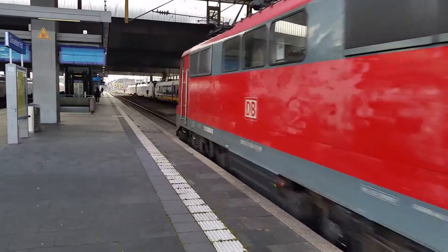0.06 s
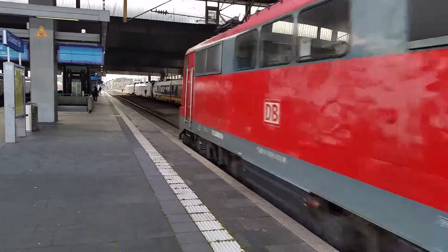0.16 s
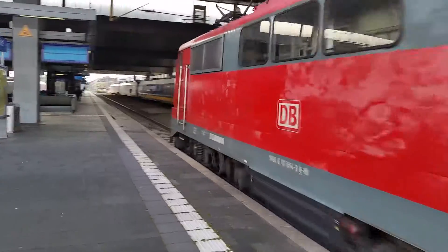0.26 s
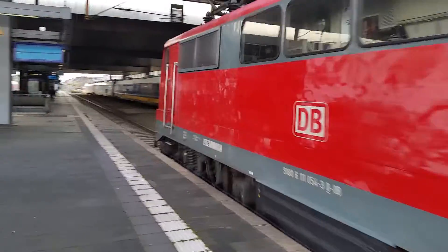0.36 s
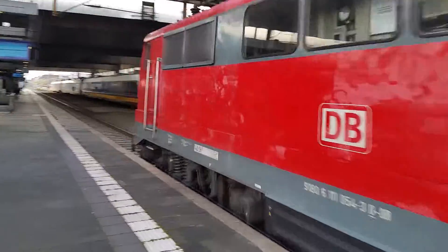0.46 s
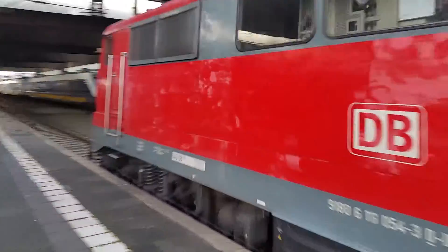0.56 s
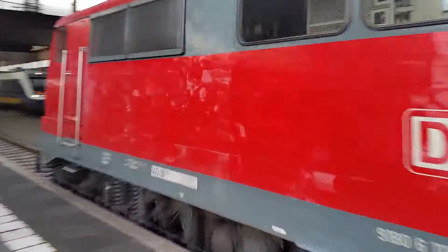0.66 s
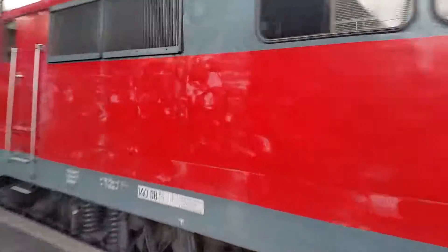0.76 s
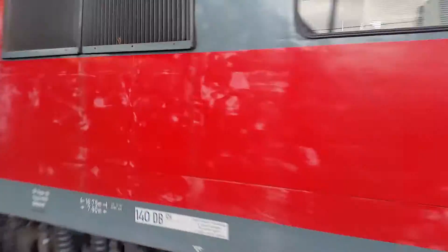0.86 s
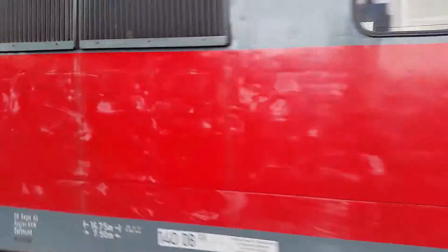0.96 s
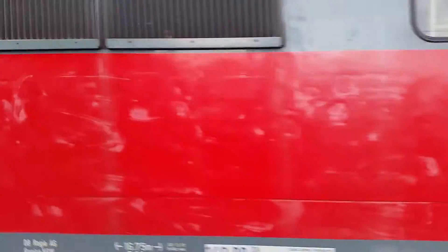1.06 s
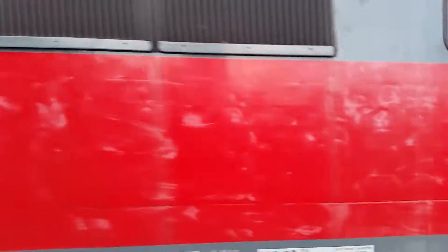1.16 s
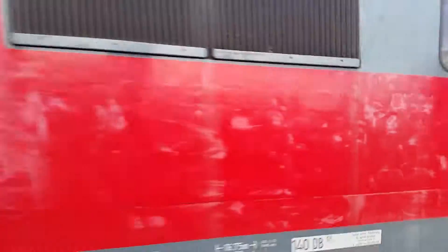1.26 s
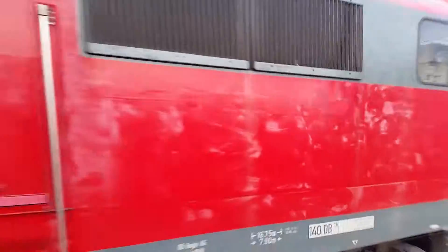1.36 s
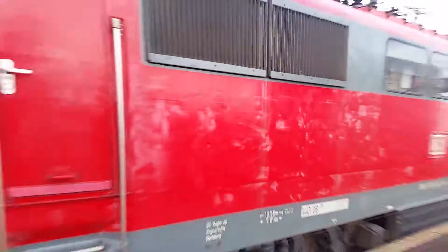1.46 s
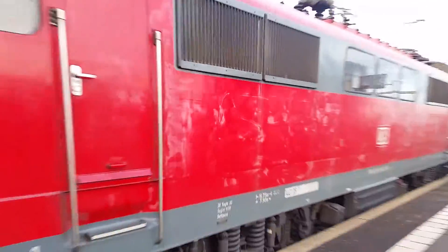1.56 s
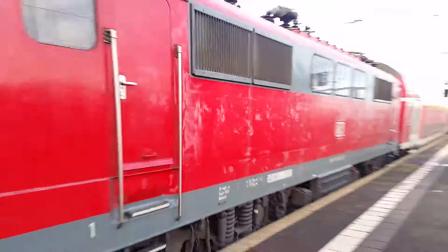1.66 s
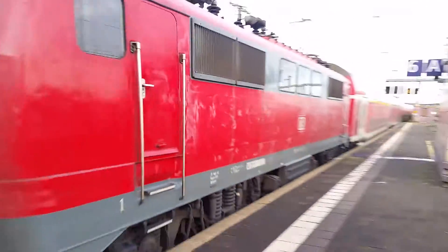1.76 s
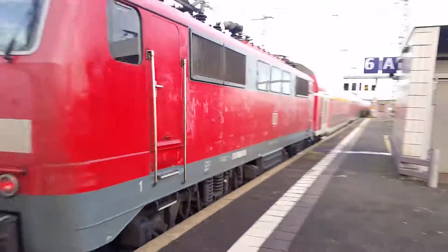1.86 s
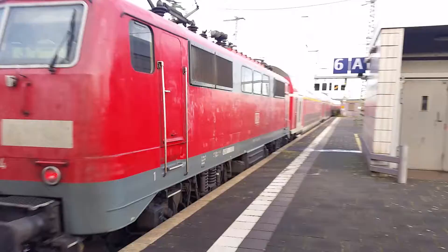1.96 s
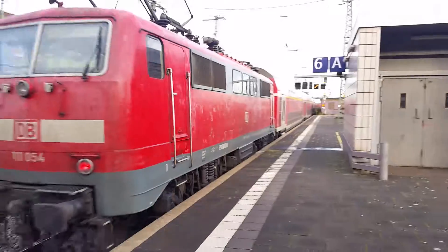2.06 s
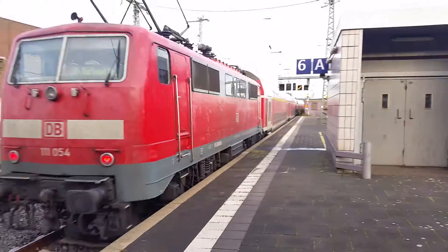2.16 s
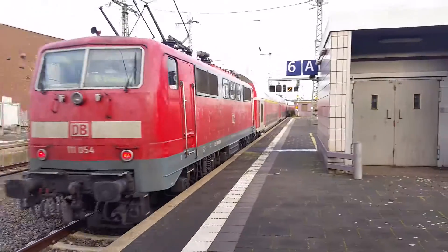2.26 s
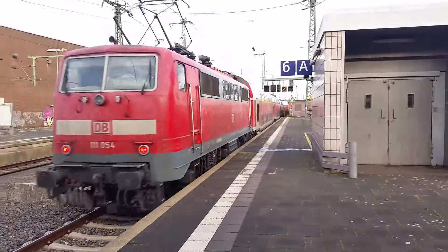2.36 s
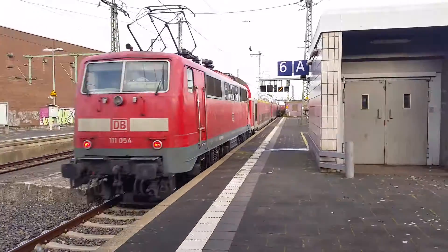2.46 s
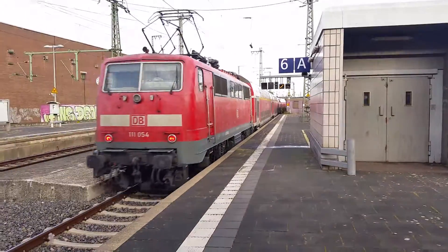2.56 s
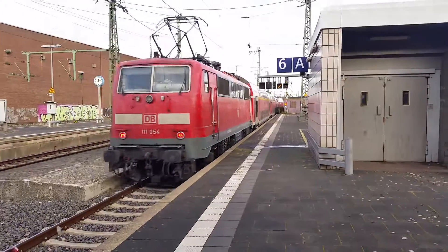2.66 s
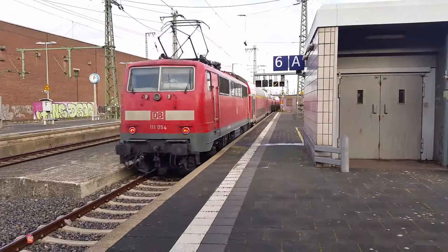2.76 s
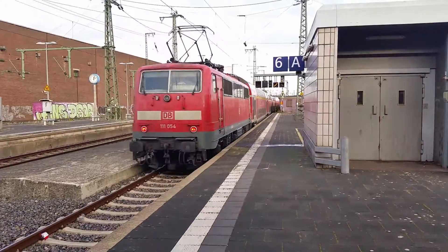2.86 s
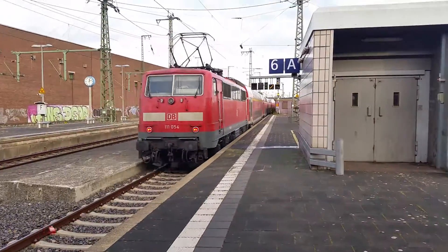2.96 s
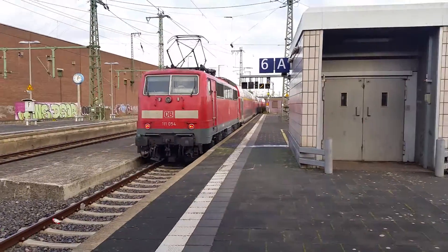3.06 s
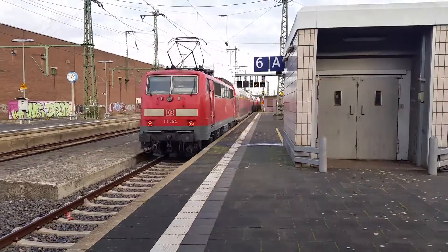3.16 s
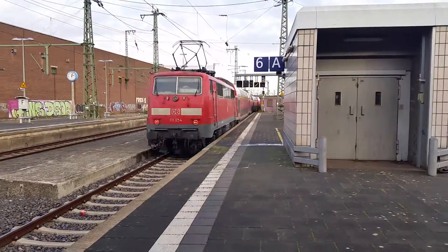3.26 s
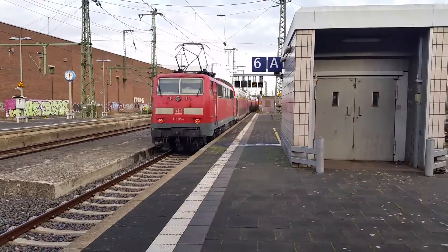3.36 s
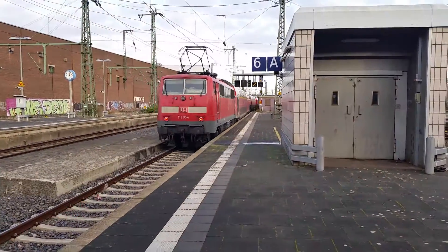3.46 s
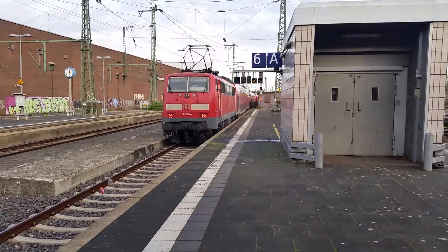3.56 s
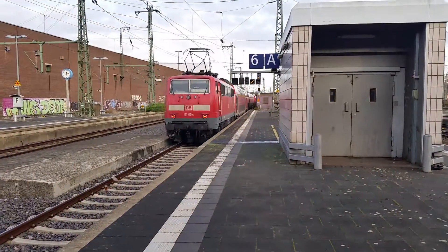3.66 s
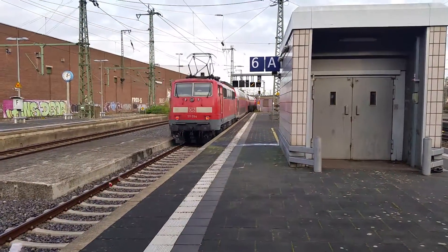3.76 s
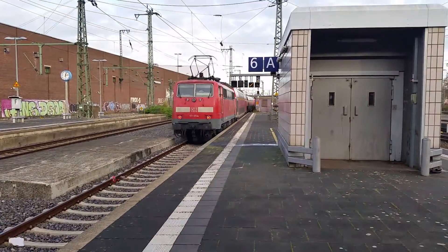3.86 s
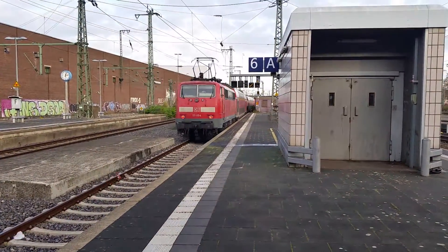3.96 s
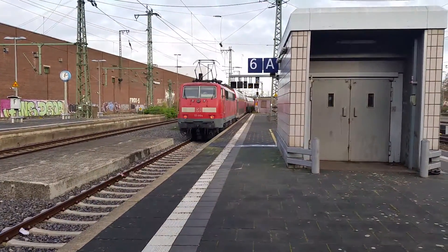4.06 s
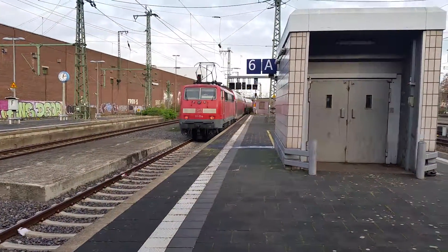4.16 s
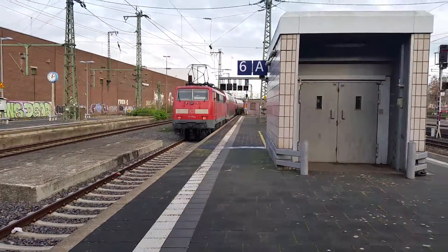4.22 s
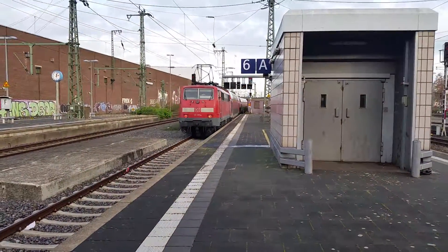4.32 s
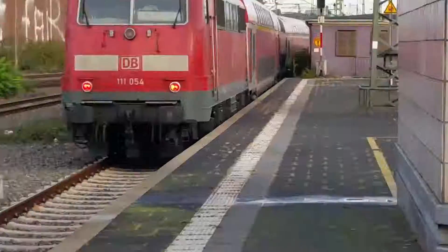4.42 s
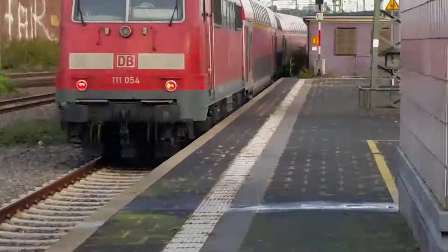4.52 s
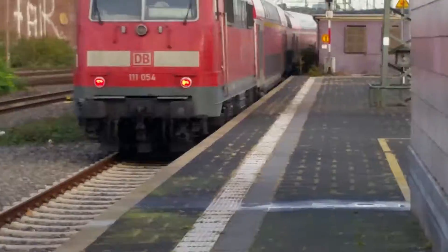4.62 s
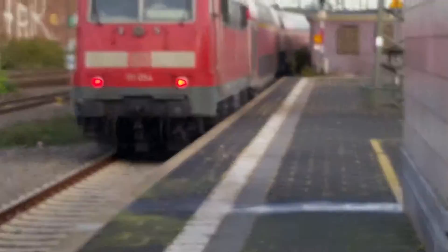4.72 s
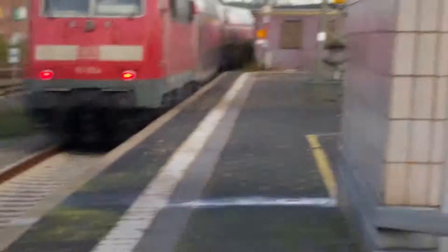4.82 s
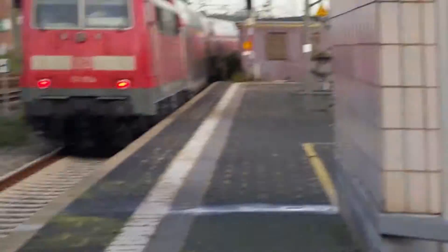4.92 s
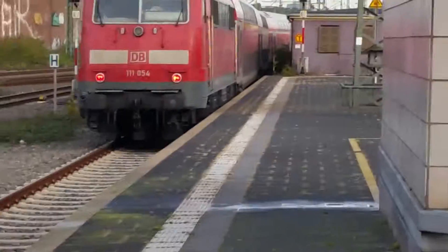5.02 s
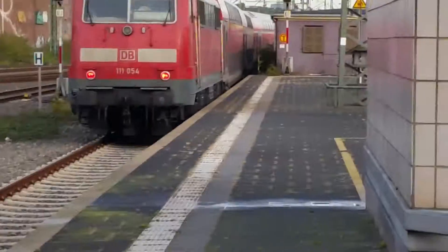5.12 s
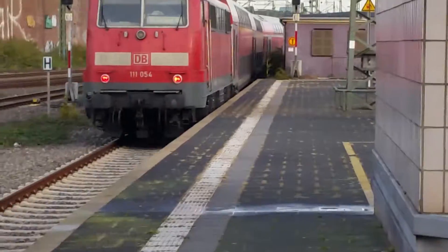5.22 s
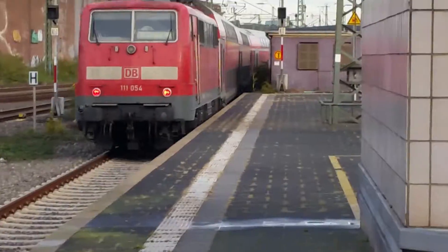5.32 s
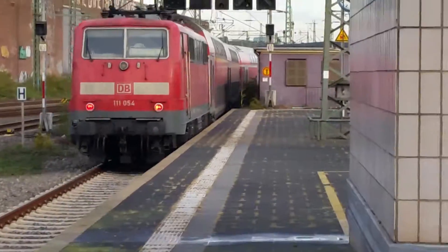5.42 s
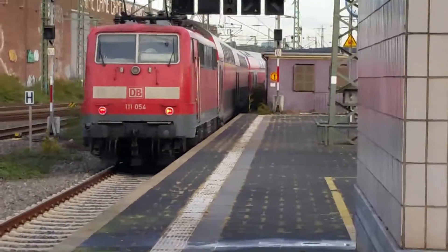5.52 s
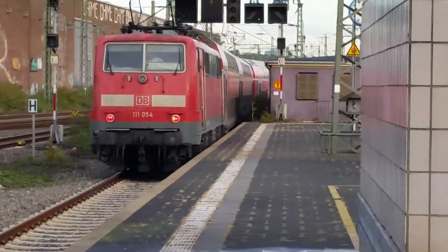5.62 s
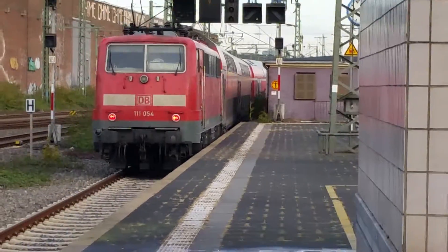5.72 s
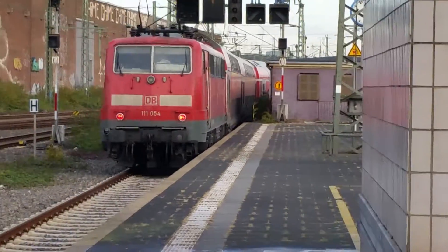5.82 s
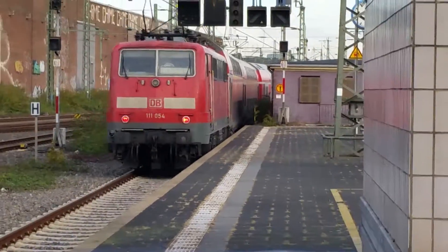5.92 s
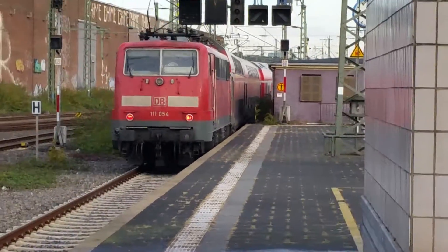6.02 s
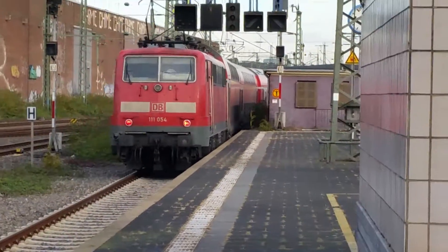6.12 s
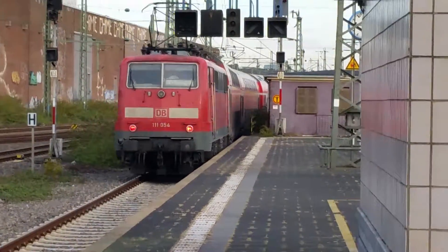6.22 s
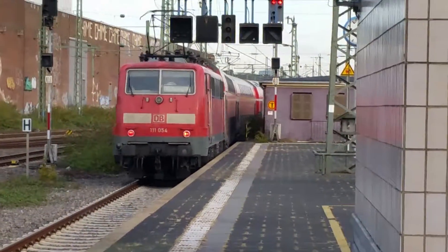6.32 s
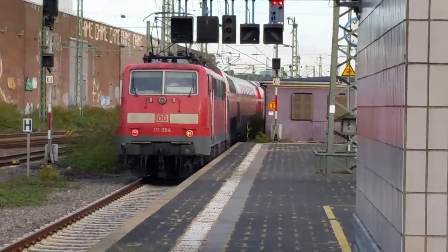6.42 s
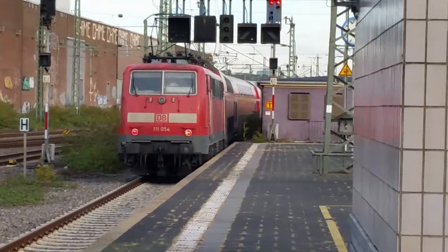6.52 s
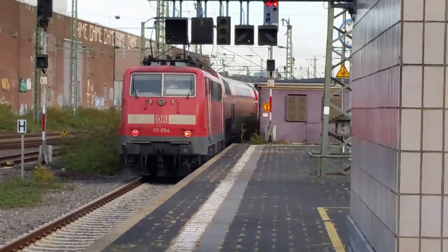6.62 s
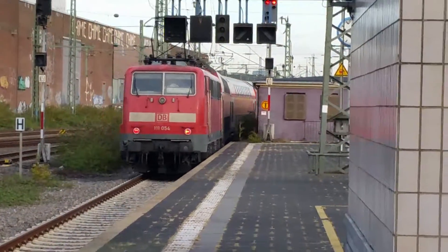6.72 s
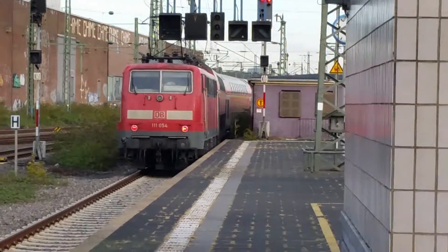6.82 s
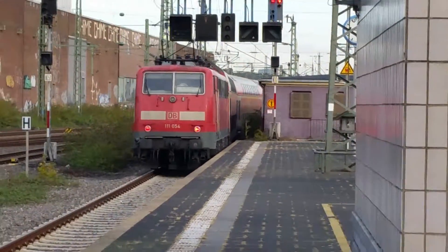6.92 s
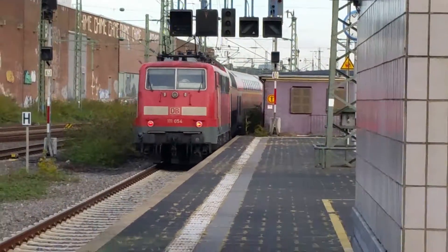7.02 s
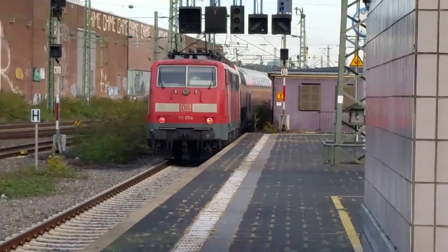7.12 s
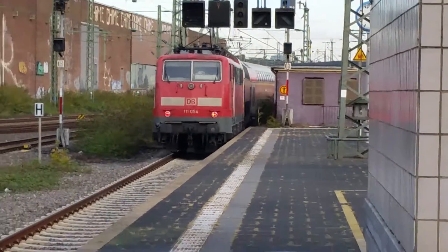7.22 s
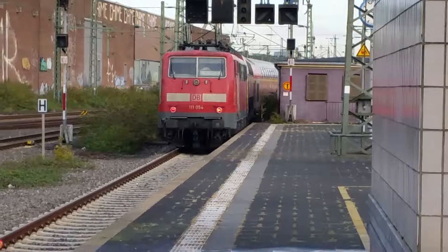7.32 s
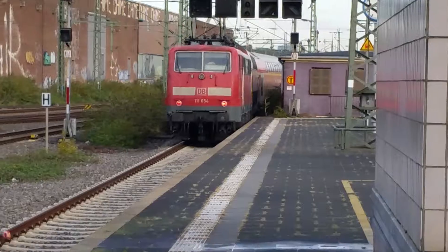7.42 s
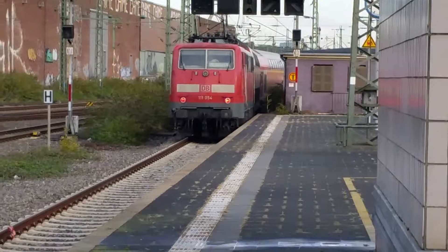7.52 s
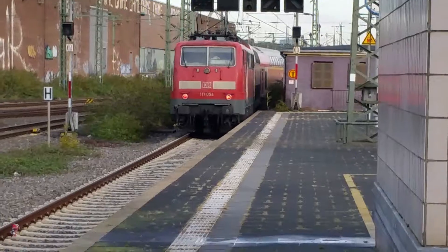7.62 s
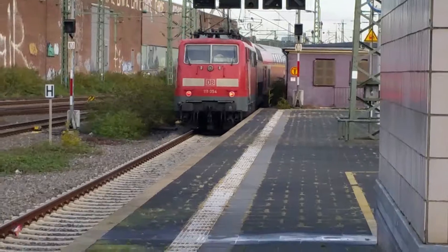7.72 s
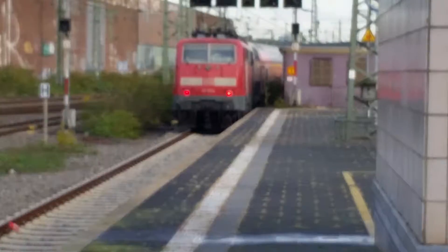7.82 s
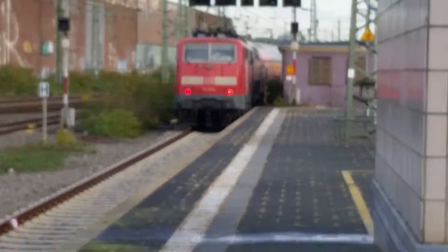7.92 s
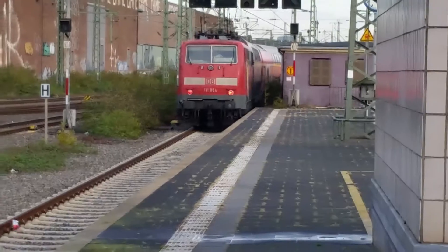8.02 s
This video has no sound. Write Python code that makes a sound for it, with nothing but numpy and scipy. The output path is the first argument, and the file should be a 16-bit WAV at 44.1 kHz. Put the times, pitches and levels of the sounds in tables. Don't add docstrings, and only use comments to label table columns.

```python
import sys
import numpy as np
from scipy import signal
from scipy.io import wavfile
from scipy.ndimage import uniform_filter1d

SR = 44100
rng = np.random.default_rng(int(sys.argv[2]) if len(sys.argv) > 2 else 0)


def natural_amplitude(level_db):
    exponent = np.asarray(level_db, float) / 20
    return 10 ** exponent


def generate_wav(sig):
    pcm = np.round(np.clip(np.atleast_2d(sig).T, -1, 1) * 32767).astype(np.int16)
    wavfile.write(sys.argv[1], SR, pcm)


N = 356328

# (time [s], loss with distance [dB])
DISTANCE_LOSS = [(0, 1), (.05, 0.5), (.5, 0), (.72, -2.1), (1.0, 0.5), (1.5, -2.64), (1.8, -3), (2.1, -4),
                 (2.4, -6.5), (2.6, -5), (3.2, -5.5), (3.75, -7.5), (4.0, -8.5), (4.9, -11.5), (6.4, -14),
                 (7.5, -14), (8.08, -15.5)]


def ramps(table):
    s, *columns = np.transpose(table)
    return [np.interp(np.arange(N) / SR, s, column) for column in columns]


def over_hz(table, hz):
    f, value = np.transpose(table)
    return np.interp(np.log(hz + 1), np.log(f + 1), value)


def walk(rate):
    k = int(SR / rate)
    held = np.repeat(rng.standard_normal(N // k + 1), k)[:N]
    return 1.316 * uniform_filter1d(uniform_filter1d(held, k), k)


def ring(x, hz, width_hz):
    return signal.lfilter(*signal.iirpeak(hz, hz / width_hz, fs=SR), x)


def pan(db):
    return natural_amplitude(np.array([db, -db]) / 2)


def swells(rows):
    t = np.arange(N) / SR
    return sum(db * np.exp(-((t - s) / width) ** 2) for s, db, width in rows)


def duck(attack_s):
    knock_s, recover_s, recover_length_s = 4.946, 5.77, 0.47
    t = np.arange(N) / SR
    fall = 1 - np.exp(-np.maximum(t - knock_s, 0) / attack_s)
    return fall * np.clip(1 - (t - recover_s) / recover_length_s, 0, 1)


def tone(hz, db, wobble_hz, rough_db, pan_db, lag):
    phase = 2 * np.pi * np.cumsum(hz + wobble_hz * walk(20.0)) / SR
    size = np.sqrt(2) * natural_amplitude(db + rough_db * walk(10.0))
    return pan(pan_db)[:, None] * size * np.sin(phase + np.array([[lag], [-lag]]))


def yard_hum():
    dip_db = -13.0 * duck(.08)
    return (tone(234.0, -38.5 + dip_db * 0.79, wobble_hz=2.2, rough_db=3.0, pan_db=0.0, lag=.05)
            + tone(145.0, -42 + dip_db * 0.62, wobble_hz=3.16, rough_db=3.5, pan_db=-4.0, lag=.05))


def singing_rail():
    # (time [s], pitch [Hz], level [dB])
    rail_tone = [(5.8, 3150, -95), (6.6, 3150, -60), (6.9, 3150, -56), (8.08, 3150, -56)]
    return tone(*ramps(rail_tone), wobble_hz=2.0, rough_db=.8, pan_db=-12.0, lag=.1)


def rustles():
    # (time [s], peak [dB], left minus right [dB], centre [Hz])
    slides = [(1.7644, -34, -4, 9530), (1.839, -35, 0.5, 8790), (2.3271, -35, 1.5, 14300),
              (2.4389, -34, 1.5, 12200), (2.8494, -40, -19, 8900), (3.0061, -31, -1, 8900),
              (3.0494, -34, -1, 10600), (3.3394, -39.5, -7, 8820), (3.4151, -33, 1.5, 9560),
              (3.8694, -43, 6, 15100), (3.929, -37, 6, 12000), (4.1779, -32, 2, 14700),
              (4.2343, -35, 0.5, 8910), (4.315, -32, 1.0, 15400), (4.8095, -48, -14, 9650),
              (5.0469, -45, -7, 11100), (6.6857, -56, 11, 15000), (6.691, -43, 2, 4500),
              (6.8573, -64, 6, 14400)]
    # (time [s], peak [dB], left minus right [dB], centre [Hz])
    slips = [(0.3501, -33, 6.5, 14300), (2.2583, -26, 5, 11600), (3.0969, -26, 11, 13900),
             (3.1238, -29, 5.0, 14500), (3.653, -25, 1.0, 9000), (3.687, -31, -3.0, 10700),
             (4.0537, -28, -2.0, 10400), (4.0574, -28, -4.5, 9000), (4.0624, -26, -5.0, 7500),
             (4.1185, -38, -4, 8730), (4.4894, -48, -2.0, 9120), (4.5146, -36, -4, 13600),
             (4.9556, -37, 5, 13000), (5.3788, -63, 10.5, 15000), (6.6982, -43, 8.5, 15200),
             (6.9126, -50, -3, 14270), (7.443, -53, 4.0, 15400), (7.9474, -54, 3.0, 14900)]
    slide_ms, slip_ms = 18, 2.5
    out = np.zeros((2, N + 4096))
    t = np.arange(4096) / SR
    chance = rng.standard_normal((len(slides + slips), 2, 2, 4096))
    lengths_ms = [slide_ms] * len(slides) + [slip_ms] * len(slips)
    for (s, db, pan_db, hz), ms, (hiss, grain) in zip(slides + slips, lengths_ms, chance):
        shape = np.minimum(t / 0.00031, 1) * np.exp(-(t * 1000 / ms) ** 2)
        crackle = hiss * natural_amplitude(2 * uniform_filter1d(grain, size=30) * np.sqrt(30))
        burst = shape * (np.diff(crackle, prepend=0) * 0.13 + ring(crackle, hz, 7800.0))
        i = int(s * SR)
        out[:, i:i + 4096] += natural_amplitude(db - 1.5) * pan(pan_db)[:, None] * burst / np.abs(burst).max()
    return out[:, :N]


def knocks():
    # (time [s], thump [dB], thump pitch [Hz], click [dB], thump left minus right [dB])
    taps = [
        (3.0490, -14, 170, -42, 14),
        (3.1245, -14, 260, -27, 12),
        (4.3039, -9, 200, -11, 10),
        (4.9535, -5, 220, -30, 12),
        (4.9556, 7, 300, -2, 7),
        (5.3400, -42, 250, -27, 6),
        (6.1275, -16, 220, -45, 2),
        (6.698, -45, 250, -30, 8),
    ]
    # (frequency [Hz], width [Hz], level [dB])
    case_modes = [(3750, 340, 4), (2300, 600, -5), (1450, 400, -3), (6800, 2500, -7)]
    out = np.zeros((2, N + 4096))
    tick = np.zeros(2048)
    tick[:12] = np.hanning(12)
    click = -sum(natural_amplitude(db) * ring(tick, f, w) for f, w, db in case_modes)
    for s, thump_db, hz, click_db, pan_db in taps:
        cycles = np.arange(2048) * hz / SR
        thump = np.sin(2 * np.pi * cycles) * cycles ** 2 * np.exp(-3.8 * cycles)
        thump = natural_amplitude(thump_db) * thump / np.abs(thump).max()
        snap = natural_amplitude(click_db) * click / np.abs(click).max()
        i = int(s * SR)
        out[0, i:i + 2048] += thump + snap
        out[1, i + 16:i + 2064] += thump * natural_amplitude(-pan_db) + snap * natural_amplitude(-15)
    return out[:, :N]


def machines():
    # (time [s], lift, below 0 a dip [dB], half width
    # [s])
    motor_swells = [(.38, -39, 0.082), (2.15, -10, 0.36), (2.75, -4, .15)]
    gear_swells = [(.3, 12.7, 0.27), (.6, 10.3, 0.081)]
    blade_swells = [(0.46, 11.8, .2), (1.135, 13.6, 0.16), (0.73, 8.5, 0.1)]
    t, loss = np.arange(N) / SR, ramps(DISTANCE_LOSS)[0]

    def slide(hz, share):
        return hz * (1 - share * np.tanh((t - .9) / 0.938))

    def gone(s):
        return -45.0 * np.maximum(t - s, 0)

    motor_db = -17 + 0.82 * loss + swells(motor_swells) + gone(2.85)
    gear_db = -31 + swells(gear_swells) + gone(2.45)
    blade_db = -33 + 0.93 * loss + swells(blade_swells) + gone(1.3)
    whine_db = -33 + 0.83 * loss - 13.0 * duck(.08) + gone(6.18) - 30 * np.maximum(2.4 - t, 0)
    return (tone(slide(214.0, 0.0214), motor_db, wobble_hz=3.26, rough_db=0.5, pan_db=0.3, lag=0.058)
            + tone(slide(171.5, 0.0274), gear_db, wobble_hz=3.1, rough_db=-0.5, pan_db=0.5, lag=0.064)
            + tone(slide(461.0, .03), blade_db, wobble_hz=7.07, rough_db=1.5, pan_db=-3.0, lag=.3)
            + tone(460.0, whine_db, wobble_hz=3.0, rough_db=3.0, pan_db=-9.0, lag=0.9))


def source_levels():
    # (level alongside [dB], share of the loss, shade before the vents face us [dB], duck [dB], attack [s])
    sources = [
        (-12.5, 1.08, -1.1, -15.5, 0.15),
        (-21, 1.026, 0, -15.5, 0.11),
        (-35.5, 1.094, -5, -23, 0.25),
        (-46, 1.5, -4.5, -32, 0.22),
    ]
    # (time [s], lift [dB], half width [s])
    surges = [(1.45, 6, 0.24), (2.85, 0.73, 0.34)]
    surge_shares = [0.044, 0.87, 0.52, 0.65]
    vents_s, vents_turn_s = 0.74, 0.14
    loss, t = ramps(DISTANCE_LOSS)[0], np.arange(N) / SR
    hidden = .5 - .5 * np.tanh((t - vents_s) / vents_turn_s)
    return [db + share * loss + shade_db * hidden + duck_db * duck(attack_s) + surge * swells(surges)
            for (db, share, shade_db, duck_db, attack_s), surge in zip(sources, surge_shares)]


def two_ports(hz, shared, own):
    # (frequency [Hz], likeness of the ports [0-1])
    likeness = [(30, .9), (60, .96), (130, .99), (290, .97), (640, .86), (1100, .62), (2200, .5),
                (4400, .3), (8000, .15), (15000, .1)]
    # (frequency [Hz], lead of the left [rad])
    lead = [(0, -1.5), (1030, -0.02), (1290, 1.63), (2150, 12.5), (2410, 12.5), (3270, 15), (5510, 17),
            (6200, 16.5), (8100, 21.5), (10900, 34.5), (12400, 39.5), (13000, 34), (16000, 49), (16600, 46)]
    # (frequency [Hz], left minus right [dB])
    balance = [(60, 1.2), (110, 1.6), (200, 1), (380, 0.5), (700, 4), (1290, 2), (2380, -2.5), (4400, -5.5),
               (8120, -1.5), (15000, 10)]
    like = over_hz(likeness, hz)[:, None]
    turn = np.exp(1j * over_hz(lead, hz))[:, None]
    pair = np.array([shared * turn, like * shared + np.sqrt(1 - like ** 2) * own])
    left, right = pan(over_hz(balance, hz))[..., None]
    summed = np.abs(left * turn + right * like) ** 2 + right ** 2 * (1 - like ** 2)
    return pair * np.array([left, right]) * 2 / np.sqrt(summed)


def colour(bass, treble, hz):
    join_hz = 1400
    step = over_hz(bass, join_hz) - over_hz(treble, join_hz)
    return np.where(hz < join_hz, over_hz(bass, hz), over_hz(treble, np.minimum(hz, 15400)) + step)


def patch_flicker(hz, frames):
    # (frequency [Hz], spread [dB])
    spread = [(100, 2.2), (1500, 1.7), (5000, .9), (15000, .8)]
    patches = np.array([walk(6.0)[frames] for _ in range(30)])
    place = np.clip(3 * np.log2((hz + 1) / 25), 0, 29)
    flicker = np.array([np.interp(place, np.arange(30), row) for row in patches.T]).T
    return over_hz(spread, hz)[:, None] * flicker


def train_noise():
    edges_hz = [30, 560, 3200, 7500, 15800]
    # (frequency [Hz], level [dB per Hz])
    near_bass = [(18, -49), (30, -32), (74, -2), (114, -6), (160, 4.5), (213, -3.5), (259, 1), (346, 0.5),
                 (426, -7.5), (454, 0), (569, -21.5), (967, -22), (1400, -27.5), (1820, -39), (3080, -120)]
    near_treble = [(820, -39), (1400, -3), (1500, -3.5), (1730, 0), (2410, -4), (4810, -16.5),
                   (5370, -12.5), (8430, -31), (11500, -34), (13800, -43), (15200, -38.5)]
    far_bass = [(18, -53), (30, -13.5), (69, -3), (134, -2), (285, -6), (412, -14), (454, -16), (492, -19),
                (588, -18.5), (999, -18.5), (1080, -21), (1400, -29), (1820, -38), (3080, -120)]
    far_treble = [(1400, -4), (1710, 0), (1970, -7), (2340, -1), (2970, -11), (3350, -9), (4480, -16),
                  (6000, -22), (6970, -29), (7480, -38), (8200, -37), (8700, -50), (13200, -42),
                  (15000, -33)]
    # (time [s], far share of rumble and roll [0-1], far share of hiss and air [0-1])
    far_share = [(0, 0.45, 0.35), (1.6, 0.04, 0.53), (2.2, 0.53, 0.02), (3.0, 0.68, 0), (3.6, 0.91, 0),
                 (4.9, 0.96, 0.3), (5.2, 0.86, 1), (8.08, 0.98, 0.92)]
    # (time [s], lift [dB], half width [s])
    bogie_swells = [(.28, 4.5, .22), (1.35, 6, .33), (2.2, -4, .4), (3.8, 2.5, .6)]
    wheel_low_swells = [(.42, 3, .12), (1.3, 8, .22)]
    wheel_width_hz = 260

    noise = rng.standard_normal((2, N))
    hz, s, (shared, own) = signal.stft(noise, SR, nperseg=2048, noverlap=1536)
    frames = np.minimum(s * SR, N - 1).astype(int)
    pair = two_ports(hz, shared, own)

    near, far = colour(near_bass, near_treble, hz), colour(far_bass, far_treble, hz)
    bass_away, treble_away = np.array(ramps(far_share))[:, frames]
    away = np.where(hz[:, None] < edges_hz[2], bass_away, treble_away)
    shape_db = near[:, None] + away * (far - near)[:, None]
    for wheel_hz, rows in [(980, bogie_swells), (790, wheel_low_swells)]:
        wheel = 1 / (1 + (2 * (hz - wheel_hz) / wheel_width_hz) ** 2)
        shape_db = shape_db + wheel[:, None] * swells(rows)[frames]

    knots, lifts = [], []
    for lo, hi, db in zip(edges_hz, edges_hz[1:], source_levels()):
        inside = (hz >= lo) & (hz < hi)
        lift = db[frames] - 10 * np.log10(natural_amplitude(2 * shape_db[inside]).sum(axis=0) / len(hz))
        knots += [lo * 1.08, hi / 1.08]
        lifts += [lift, lift]
    lift_db = np.array([np.interp(np.log(hz + 1), np.log(knots), row) for row in np.transpose(lifts)]).T

    flicker_db = patch_flicker(hz, frames) * (1 - 0.25 * away)
    return signal.istft(pair * natural_amplitude(shape_db + lift_db + flicker_db), SR, noverlap=1536)[1][:, :N]


def scene():
    return yard_hum() + singing_rail() + rustles() + knocks() + machines() + train_noise()


def band_limit(x):
    return signal.sosfilt(signal.butter(12, 17060, fs=SR, output="sos"), x)


def record(dry):
    rounded = dry / (1 + np.abs(dry / .96) ** 6) ** (1 / 6)
    top_cut = signal.ellip(10, .2, 70, 15850, fs=SR, output="sos")
    return band_limit(signal.sosfilt(top_cut, rounded))


dry = scene()
out = record(dry)
generate_wav(out)
```